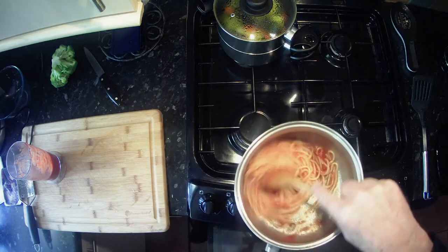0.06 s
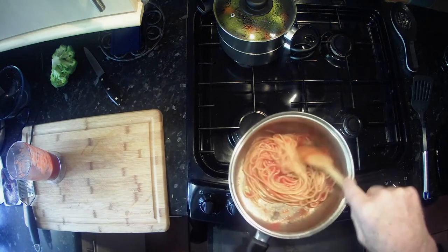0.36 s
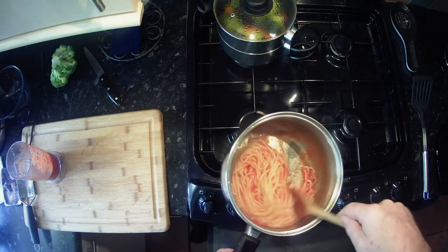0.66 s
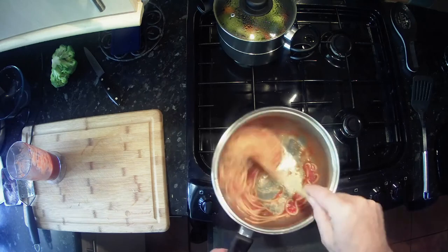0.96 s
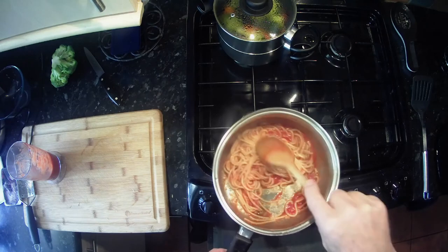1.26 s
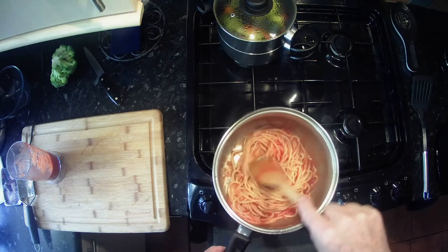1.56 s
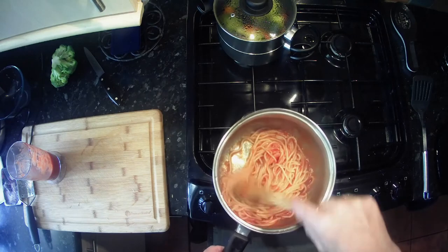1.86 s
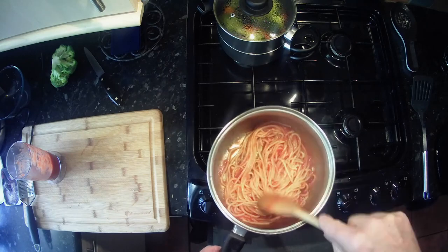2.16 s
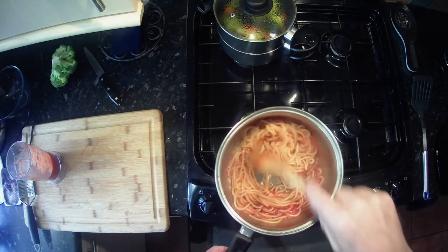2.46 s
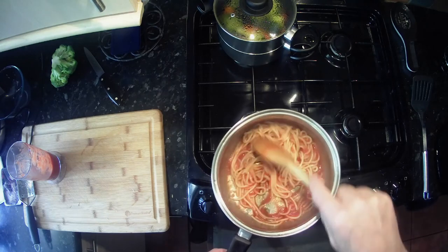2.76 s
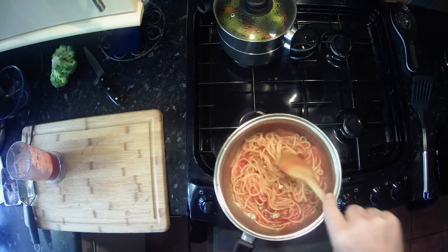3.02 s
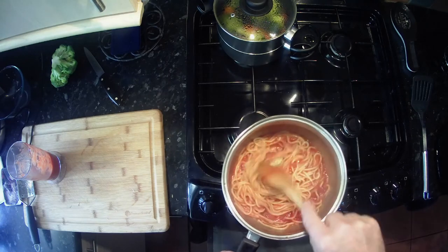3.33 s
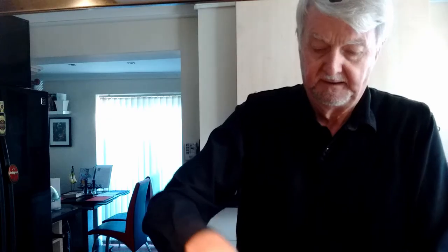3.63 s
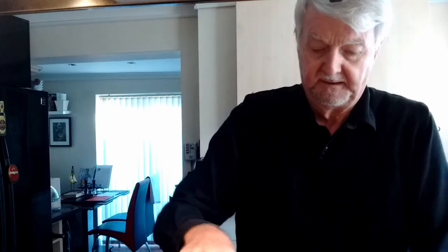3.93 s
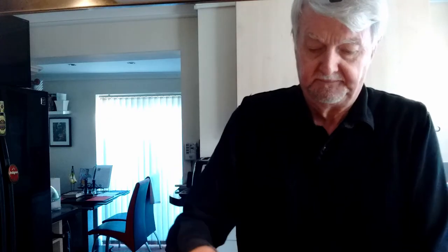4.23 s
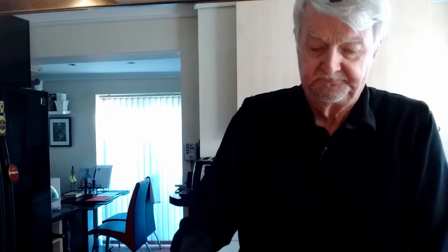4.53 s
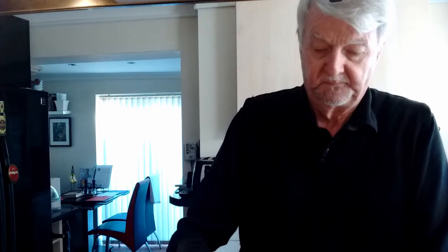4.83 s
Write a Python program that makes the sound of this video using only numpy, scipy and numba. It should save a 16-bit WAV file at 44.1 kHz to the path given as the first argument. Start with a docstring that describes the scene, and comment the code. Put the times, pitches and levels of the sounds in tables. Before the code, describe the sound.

A wooden spoon stirs wet spaghetti in a steel saucepan, with squelches, knocks and two ringing rim taps over a low gas burner rumble.

```python
"""A small kitchen, close to a steel saucepan on a rumbling gas hob.
A wooden spoon turns spaghetti through tomato sauce: wet strands crackle with each stroke,
films of sauce tick as they tear, and air pockets pop in squelches. The spoon knocks the pan,
the pan clanks on its grate, and two last raps on the rim ring out.
A two-port microphone hears it all; its gain control ducks after each loud blow."""
import sys
import numpy as np
from scipy import signal
from scipy.fft import rfft, irfft
from scipy.io import wavfile
from scipy.ndimage import uniform_filter1d
from numba import njit

SR = 44100
rng = np.random.default_rng(int(sys.argv[2]) if len(sys.argv) > 2 else 0)


def wrap_up_sound(samples):
    """Save the sound to the file named by the first command line argument, as 16-bit audio."""
    columns = np.atleast_2d(samples).T
    # keep every value between -1 and 1, then stretch to whole-number steps
    tamed = np.clip(columns, -1, 1)
    steps = np.round(tamed * 32767).astype(np.int16)
    wavfile.write(sys.argv[1], SR, steps)


N = 215463
TIME = np.arange(N) / SR


def undb(db):
    """Decibels to gain."""
    return 10 ** (np.asarray(db) / 20)


def unit(x):
    """Scale to rms 1."""
    return x / np.sqrt(np.mean(x ** 2))


def on_log_axis(points, f):
    """Read (Hz, value) points at the frequencies f."""
    at, value = np.transpose(points)
    return np.interp(np.log(f + 1), np.log(at + 1), value)


def colour(x, points):
    """Shape x with an EQ curve of (Hz, dB) points."""
    n = x.shape[-1]
    return irfft(rfft(x) * undb(on_log_axis(points, np.fft.rfftfreq(n, 1 / SR))), n)


def butter(order, hz, kind="low"):
    """A Butterworth filter as second-order sections."""
    return signal.butter(order, hz, kind, fs=SR, output="sos")


def fade(t, t60):
    """Exponential decay, 60 dB in t60."""
    return np.exp(-np.log(1000) * t / t60)


def add(out, start, x):
    """Mix x into out from the start time on."""
    i = max(int(start * SR), 0)
    out[i:i + len(x)] += x[:max(N - i, 0)]


def drift(per_s):
    """A smooth random wander with a spread near 1."""
    hold = int(SR / per_s)
    steps = np.repeat(rng.standard_normal(N // hold + 1), hold)
    return unit(uniform_filter1d(steps, hold))[:N]


def stereo(mid, side, width):
    """Left and right from a shared and an opposed part."""
    return np.array([mid + width * side, mid - width * side])


# Slap off the wall behind the hob. Each row: delay in seconds, level in dB.
WALL_ECHOES = [(.0088, -19)]
def kitchen(x, t60_low=0.24, t60_high=0.053, wet_db=-6.0, crossover_hz=2500):
    """Direct sound, a wall echo and a short tail whose treble is wider and dies first."""
    t = TIME[:SR // 2]
    mid, side = rng.standard_normal((2, len(t)))
    low = signal.sosfilt(butter(2, crossover_hz), stereo(mid, side, width=0.49))
    high = signal.sosfilt(butter(2, crossover_hz, "high"), stereo(mid, side, width=1.0))
    onset = np.minimum(t / 0.0015, 1)
    tail = onset * (low * fade(t, t60_low) + undb(8.5) * high * fade(t, t60_high))
    response = undb(wet_db) * unit(tail) / np.sqrt(len(t))
    response[:, 0] += 1  # direct sound
    for delay, db in WALL_ECHOES:
        response[:, int(delay * SR)] += undb(db)
    return signal.fftconvolve(x[None], response, axes=1)[:, :N]


# The burner's bed of rumble and hiss. Each row: frequency in Hz, relative level in dB.
BURNER_EQ = [(15, -86), (25, -12.5), (59, -33), (80, -11), (118, 4.5), (146, -3), (207, 4.5), (249, -9.5),
             (427, -12), (516, -18.5), (773, -17), (1080, -28), (1290, -22.5), (1500, -33), (2470, -35.5),
             (13600, -40), (16000, -50)]
def hob(level_db=-32):
    """The gas flames rumble and flutter under a smooth hiss."""
    noise = stereo(*colour(rng.standard_normal((2, N)), BURNER_EQ), width=0.36)
    rumble = signal.sosfiltfilt(butter(2, 400), noise)
    flutter = undb(drift(per_s=9)) - 1
    return undb(level_db) * (noise + flutter * rumble) / np.std(noise)


# The tone of wet crackle. Each row: frequency in Hz, relative level in dB.
WET_EQ = [(300, 9), (900, 1.5), (1300, -4), (1700, -1.5), (2500, 2), (3400, -1.5), (4800, -1), (6000, -7),
          (8500, -2.5), (11000, -6.5), (14000, -8.5), (16000, -23)]
def wet_snaps(n, per_s, spread_db):
    """Films of sauce snap at random: many small ones, a few large."""
    size = undb(spread_db * np.minimum(rng.exponential(size=n), np.pi))
    polarity = rng.choice([-1, 1], n)
    fires = rng.random(n) < per_s / SR
    return colour(unit(size * polarity * fires + 1e-9), WET_EQ)


def bubble(t, hz, cycles, glide):
    """An air pocket rings down 60 dB over some cycles; its pitch bends up, or down if glide < 0."""
    life = t * hz / cycles
    return np.sin(2 * np.pi * hz * t * (1 + glide * np.minimum(life, 1))) * fade(life, 1)


# Spoon strokes, each a bell-shaped swell. Each row: centre in seconds, level in dB,
# half-width in seconds.
SPOON_STROKES = [(0.083, -50.5, 0.075), (0.221, -43, 0.039), (0.48, -44, 0.12), (0.702, -51, 0.097),
                 (0.84, -59, 0.012), (1.12, -43.5, 0.099), (1.378, -46.5, 0.044), (1.578, -42, 0.07),
                 (1.776, -39.5, 0.052), (2.023, -48, 0.088), (2.59, -44, 0.15), (3.221, -45.5, 0.028),
                 (3.362, -52, 0.34), (3.61, -44.5, 0.11), (3.804, -60, 0.11), (3.982, -61, 0.24)]
def stirring(settling_db=-68):
    """Pasta crackles and fizzes in flurries as the spoon moves it, and faintly as it settles."""
    swells = sum(undb(db) * np.exp(-((TIME - centre) / half) ** 2) for centre, db, half in SPOON_STROKES)
    motion = (undb(settling_db) + swells) * undb(2.0 * drift(per_s=35))
    crackle = unit(wet_snaps(N, per_s=1500, spread_db=3))
    fizz = np.zeros(N)
    for when, highness, faintness in rng.random((1100, 3)):
        hz = 3000 + 11000 * highness ** 1.6
        pop = bubble(TIME[:SR // 50], hz, cycles=36, glide=0.05)
        add(fizz, when * N / SR, undb(-22 * faintness + 3.6 * highness) * pop)
    return motion * (undb(-2.0) * crackle + undb(-6.5) * unit(fizz))


# The bright tone of a tear. Each row: frequency in Hz, relative level in dB.
TEAR_EQ = [(500, -17), (2500, -18), (4000, -6), (6000, -2.5), (9000, 0.5), (12500, 4), (16000, -13)]
# Ticks of tearing sauce. Each row: start in seconds, level in dB.
FILM_TEARS = [(0.1865, -40), (0.353, -28.5), (0.759, -39), (1.282, -37), (1.296, -35), (1.511, -24.5),
              (2.402, -37.5), (2.4528, -42), (3.4905, -32), (3.963, -38.5), (3.9784, -42)]
def tears(t60=0.029):
    """A taut film of sauce rips all at once and traps no air: one dry, bright tick."""
    out, t = np.zeros(N), TIME[:SR // 20]
    for start, db in FILM_TEARS:
        noise = unit(colour(rng.standard_normal(len(t)), TEAR_EQ))
        add(out, start, undb(db) * noise * fade(t, t60))
    return out


# The featured squelches. Each row: start in seconds, level in dB, air pocket pitch in Hz,
# decay time of the burst in seconds.
STRAND_SQUELCHES = [(0.078, -39, 3440, 0.002), (0.088, -28, 3500, 0.007), (0.127, -40, 6560, 0.002),
                    (0.262, -34, 3780, 0.003), (0.35, -28, 3930, 0.004), (0.3596, -24.5, 3780, 0.011),
                    (0.3605, -22.5, 8200, 0.006), (0.425, -33, 3330, 0.005), (0.479, -28, 6400, 0.009),
                    (0.511, -28.5, 3370, 0.011), (0.551, -28, 4900, 0.005), (0.569, -32, 4600, 0.005),
                    (0.6317, -24, 6200, 0.011), (0.8325, -42, 3320, 0.002), (0.8504, -29.5, 3400, 0.008),
                    (0.9234, -20.5, 4160, 0.009), (1.1024, -22, 6370, 0.007), (1.3593, -31.5, 3700, 0.009),
                    (1.529, -23.5, 6200, 0.007), (1.573, -32, 3450, 0.004), (1.5828, -27, 3620, 0.007),
                    (1.748, -35, 3690, 0.004), (1.7604, -25.5, 3950, 0.007), (1.771, -20, 4730, 0.008),
                    (2.8923, -35, 4140, 0.002), (2.9124, -28, 3200, 0.008), (3.0811, -29.5, 3800, 0.004),
                    (3.1773, -32, 3930, 0.009), (3.269, -36, 3530, 0.003), (3.319, -30.5, 3390, 0.011),
                    (3.491, -30.5, 4170, 0.0019), (3.5186, -33.5, 3930, 0.002), (3.562, -25, 3960, 0.01),
                    (3.617, -32, 5700, 0.004), (3.643, -31, 3600, 0.004), (3.6775, -28, 4160, 0.008),
                    (3.6952, -26.5, 8150, 0.008), (3.7167, -28, 3320, 0.008), (3.9615, -36, 4500, 0.0025),
                    (4.076, -38.5, 4180, 0.00194), (4.101, -37, 5300, 0.0022)]
def squelches(burst_db=-7, pocket_db=-2, large_pocket_hz=3500):
    """Parting strands let go at once: a dying burst of snaps and three popping air pockets."""
    out, t = np.zeros(N), TIME[:SR // 10]
    for start, db, pocket_hz, decay_s in STRAND_SQUELCHES:
        dying = np.exp(-t / decay_s)
        burst = unit(dying * wet_snaps(len(t), per_s=2200, spread_db=6.0))
        add(out, start, undb(db + burst_db) * burst * np.sqrt(np.mean(dying ** 2)))
        pop_db = db + pocket_db - 3 * np.log2(pocket_hz / large_pocket_hz)  # small pockets are fainter
        for k, (when, detune) in enumerate(rng.random((3, 2))):  # each pop lower and softer
            hz = pocket_hz * (1 - 0.057 * k + 0.017 * (detune - .5))
            pop = bubble(t, hz, cycles=34, glide=-0.012)
            add(out, start + k * (1 + when) * decay_s / 3, undb(pop_db - 4 * k) * pop)
    return out


def modes(table, t, height, muted_db=0):
    """Decaying modes, balanced by strike height (0 base, 1 rim); a touch mutes the low ones first."""
    out = np.zeros(len(t))
    for k, (hz, t60, base_db, rim_db) in enumerate(table):
        db = base_db + height * (rim_db - base_db) - muted_db * (1030 / hz) ** 0.7
        out += (-1) ** k * undb(db) * np.sin(2 * np.pi * hz * t) * fade(t, t60)
    return out


# The grit of a blow. Each row: frequency in Hz, relative level in dB struck at the base and at the rim.
CRACK_EQ = [(100, -13, 11.5), (400, -4, -8), (1100, -1, -10), (1500, -11, 1), (1900, -1, 5), (2450, -2, -2),
            (3650, -1, 1), (5110, -2, 2), (7100, -1, -3), (8700, 6.5, 2), (11700, -11, -7.5),
            (16000, -19, -16)]
def crack(t, height, crossover_hz=5500):
    """The dense overtones of a blow: a short crash and a tail whose treble dies first."""
    spectrum = [(hz, base_db + height * (rim_db - base_db)) for hz, base_db, rim_db in CRACK_EQ]
    overtones = unit(colour(rng.standard_normal(len(t)), spectrum))
    low = signal.sosfiltfilt(butter(3, crossover_hz), overtones)
    tail = low * fade(t, 0.36) + (overtones - low) * fade(t, 0.21)
    return undb(3.5) * overtones * fade(t, 0.03) + undb(-4.0) * tail


# The ring of the steel, in four parallel lists. Each mode: pitch in Hz, t60 in seconds,
# level in dB struck at the base and at the rim.
RING_HZ = [664, 835, 1082, 1267, 1322, 1511, 1659, 1944, 2114, 2345, 2561, 2756, 2888, 2897, 2963, 3031,
           3076, 3292, 3506, 3516, 3581, 3769, 3908, 3981, 4280, 4366, 4667, 4970, 5186, 5249, 5438, 5496,
           6610, 8032, 8936]
RING_T60_S = [1.0, 3.4, 0.4, 0.12, 0.11, 0.29, 0.18, 0.26, 0.19, 0.26, 0.15, 0.2, 0.21, 0.48, 0.53, 0.29,
              0.41, 0.18, 0.37, 0.1, 0.21, 0.12, 0.13, 0.26, 0.18, 0.54, 0.22, 0.2, 0.1, 0.2, 0.17, 0.13,
              0.14, 0.12, 0.11]
RING_BASE_DB = [-15.5, -5, -7, -4.5, -43, -31, -43, -3.5, -2, 1, -8, -3, -8, -8, -2, 0, -9, -16, -24, -48,
                -22, -3, -3, -15, -25, -50, -23, -16, -33, -36, -26, -19, -30, -32, -27]
RING_RIM_DB = [-19.5, -19, -8, -23, 9, -6, -10, -12, -39, -16, -41, -28, -9, 1, -25.5, -24, -6.5, -5.5, 4.5,
               -14, -24, -37, -26, -0.5, -18, -14.5, -33, -17, -2, -7, 0, -6, -26, -13, -14]
def steel_ring(t, height, muting, free_s):
    """The steel rings freely for free_s, then is choked; muting is in dB per second at 1030 Hz."""
    muted_db = muting * np.maximum(t - free_s, 0)
    return modes(zip(RING_HZ, RING_T60_S, RING_BASE_DB, RING_RIM_DB), t, height, muted_db)


# The short body of a blow. Each row: pitch in Hz and t60 in seconds before detuning,
# level in dB struck at the base and at the rim.
BODY_MODES = [(304, 0.0029, -25, -3.5), (430, 0.016, -20.5, -1.5), (584, 0.031, -2.5, -7),
              (739, 0.026, -7, -17.5), (820, 0.047, -0.5, -20), (1138, 0.026, -3, -0.5),
              (1193, 0.014, -1.5, 6), (1308, 0.032, -7.5, 5.5), (1986, 0.041, -6.5, -9.5),
              (2137, 0.046, -3.5, -18), (2540, 0.031, -5, -46), (3020, 0.052, 8.5, -35),
              (4054, 0.014, 2.5, -32), (5296, 0.015, -22.5, -7), (8400, 0.041, -14, -14.5)]
def blow(db, contact_ms, height, ring_db, muting, free_s=0, pitch=1):
    """A short push drives the loaded pan's body, ring and crack; longer contact is duller."""
    t = TIME[:SR // 2]
    detune = pitch * (1 + 0.012 * rng.uniform(-0.96, 1))  # shifting pasta retunes each blow a little
    body = modes(BODY_MODES, t * detune, height)
    metal = steel_ring(t, height, muting, free_s) + crack(t, height)
    age = t[:SR // 100] * 1000 / contact_ms
    push = age * np.exp(-age)
    return undb(db) * signal.fftconvolve(body + undb(ring_db) * metal, push / push.sum())


# Cushioned spoon knocks. Each row: start in seconds, level in dB, contact time in ms,
# height from base 0 to rim 1, pitch factor set by the load of pasta.
SPOON_KNOCKS = [(0.076, 0.5, 0.91, 0, 1.02), (0.8717, 6.5, 0.093, 0.6, 0.95), (1.5384, 1, 0.5, 0.18, 0.97),
                (1.772, -7, 0.31, 0, 1.01), (2.051, -2, 0.4, 0.23, 0.98), (2.07, -12, 0.24, 0.47, 0.88),
                (2.1918, 17, 0.24, 0.36, 1), (2.9219, 5, 0.11, 0.38, 1.01), (3.1806, 7.5, 0.45, 0.47, 1.01),
                (3.206, 8.5, 0.42, 0.31, 1.015), (3.368, -5, 0.77, 0.11, 0.947)]
# One quick clatter on the grate. Each row: start in seconds, level in dB, contact time in ms, height.
GRATE_CLANKS = [(2.1598, 3, 0.05, 0.24), (2.1676, 0, 0.07, 0.11), (2.178, -9, 0.044, 0.16),
                (2.2035, -6.5, 0.074, 0.093)]
# Raps that ring until the pan is touched. Each row: start in seconds, level in dB,
# contact time in ms, height, free ringing in seconds.
STEEL_RAPS = [(1.9669, -8.5, 0.053, 0.26, 0.19), (4.5836, 9, 0.035, 0.96, 0.13),
              (4.7496, 10, 0.085, 0.96, 0.04)]
def pan(radiates_above_hz=270):
    """Knocks through pasta barely wake the steel; rocking on the grate and bare raps make it ring."""
    out = np.zeros(N)
    for start, db, contact_ms, height, pitch in SPOON_KNOCKS:
        add(out, start, blow(db, contact_ms, height, ring_db=-20, muting=560, pitch=pitch))
    for start, db, contact_ms, height in GRATE_CLANKS:
        add(out, start, blow(db, contact_ms, height, ring_db=-3, muting=169))
    for start, db, contact_ms, height, free_s in STEEL_RAPS:
        add(out, start, blow(db, contact_ms, height, ring_db=-14.5, muting=280, free_s=free_s))
    return signal.sosfilt(butter(2, radiates_above_hz, "high"), out)  # a small pan gives little bass


def scene():
    """Pan and pasta in the kitchen, over the bed of the burner."""
    return kitchen(pan() + squelches() + tears() + stirring()) + hob()


@njit
def follow_peaks(size, attack_s, release_s):
    """An envelope that jumps up with a peak and sinks slowly."""
    attack, release = 1 / (attack_s * SR), 1 / (release_s * SR)
    out, level = np.empty(len(size)), 0.
    for i in range(len(size)):
        level += (size[i] - level) * (attack if size[i] > level else release)
        out[i] = level
    return out


# Phase between the microphone ports. Each row: frequency in Hz, lead of the left in radians.
LEFT_PHASE = [(0, 5), (100, 0.5), (400, 0.75), (1400, -0.39), (3360, -6), (4050, -6), (4650, -9),
              (7400, -15), (9800, -22), (15700, -38.5)]
# Balance between the ports. Each row: frequency in Hz, left minus right in dB.
LEFT_BALANCE = [(30, 0), (70, -10), (110, -10.5), (200, -3), (400, -2), (1300, -1.5), (2500, -1.5),
                (4000, -2.5), (6000, -5.5), (8000, -2), (10000, -5), (12000, -12), (15000, -16)]
def record(dry, threshold=0.71, low_cut_hz=36, top_hz=15800):
    """Two ports differ in delay and level; gain control ducks after blows, and the first peaks clip."""
    f = np.fft.rfftfreq(N, 1 / SR)
    balance = undb(on_log_axis(LEFT_BALANCE, f))
    phase = np.exp(1j * np.interp(f, *np.transpose(LEFT_PHASE)))
    ports = np.array([balance * phase, np.ones(len(f))]) * 2 / (1 + balance)
    x = irfft(rfft(dry) * ports, N)
    envelope = follow_peaks(np.abs(x).max(axis=0), attack_s=0.00019, release_s=0.96)
    ducked = x / np.maximum(envelope / threshold, 1)
    x = signal.sosfilt(butter(2, low_cut_hz, "high"), np.clip(ducked, -1, 1))
    return signal.sosfilt(signal.ellip(12, .2, 90, top_hz, fs=SR, output="sos"), x)


dry = scene()
out = record(dry)
wrap_up_sound(out)
```